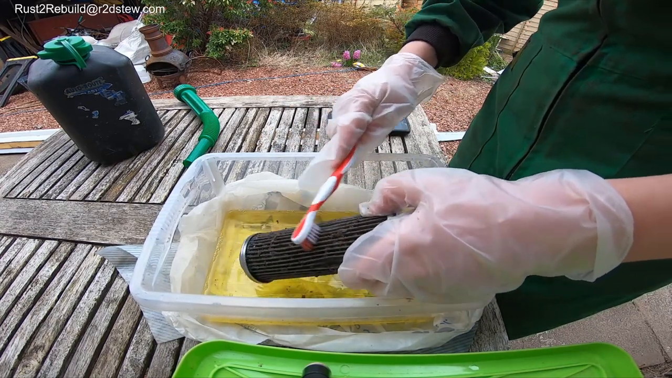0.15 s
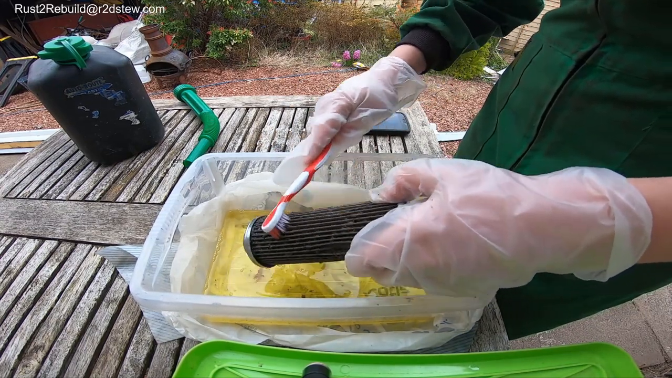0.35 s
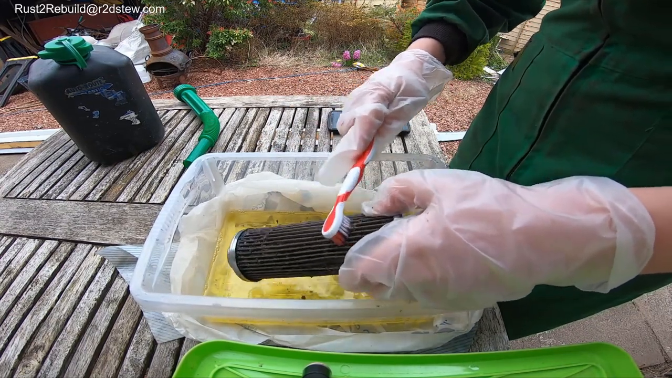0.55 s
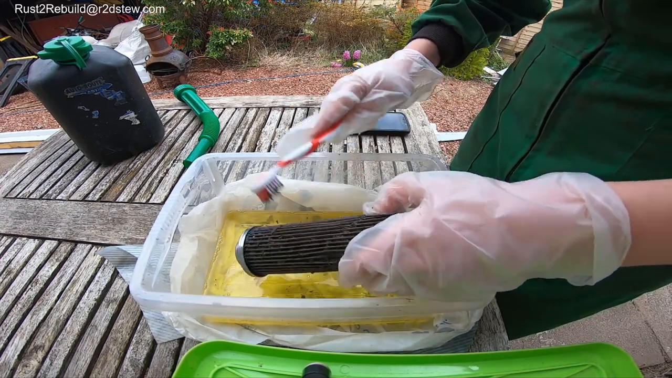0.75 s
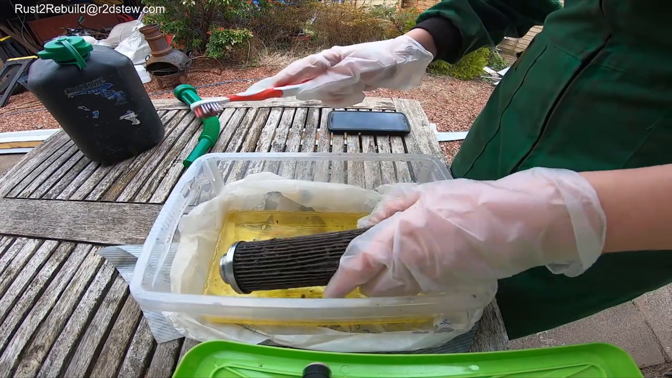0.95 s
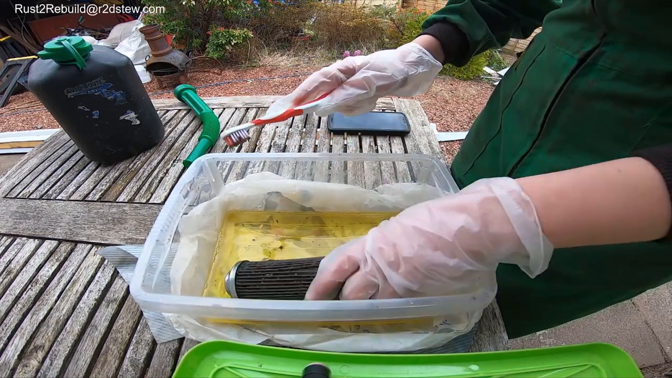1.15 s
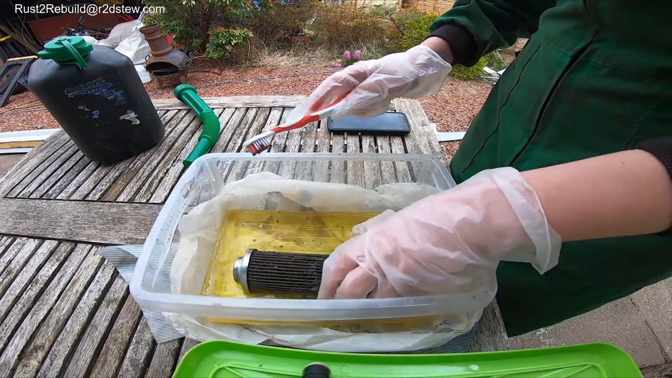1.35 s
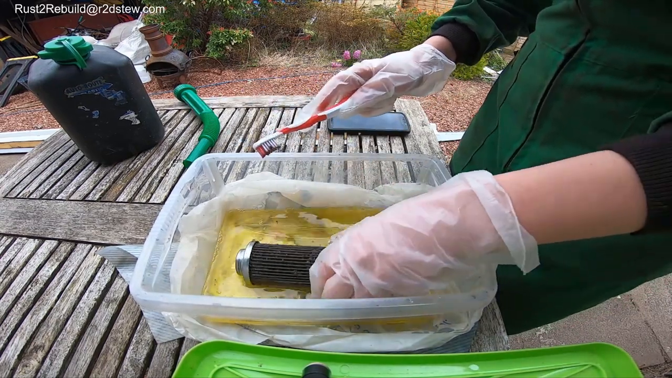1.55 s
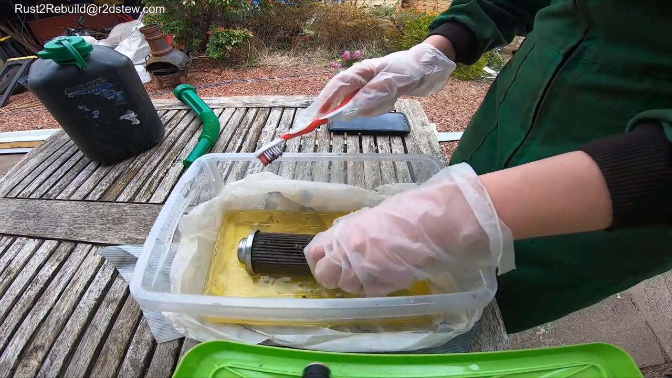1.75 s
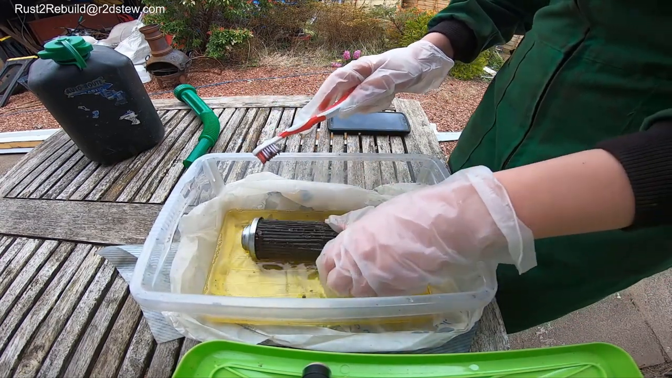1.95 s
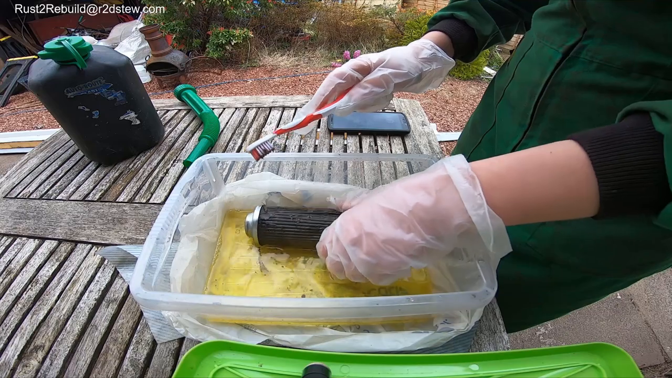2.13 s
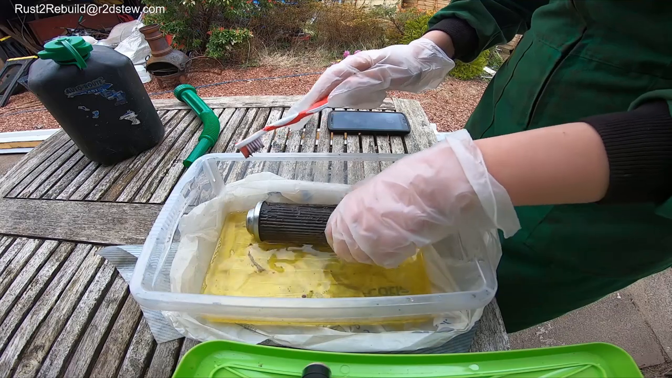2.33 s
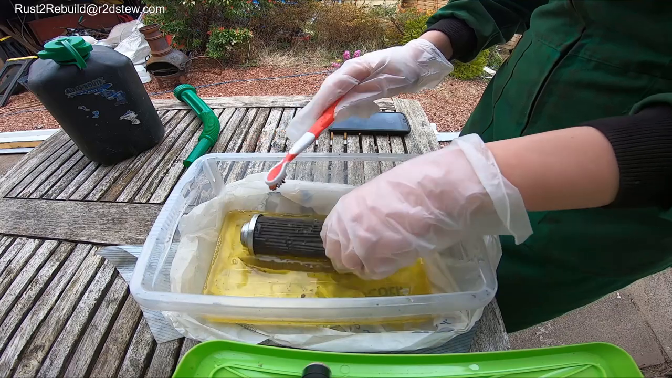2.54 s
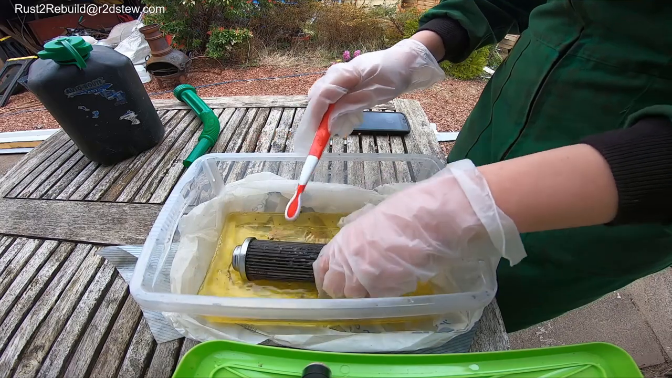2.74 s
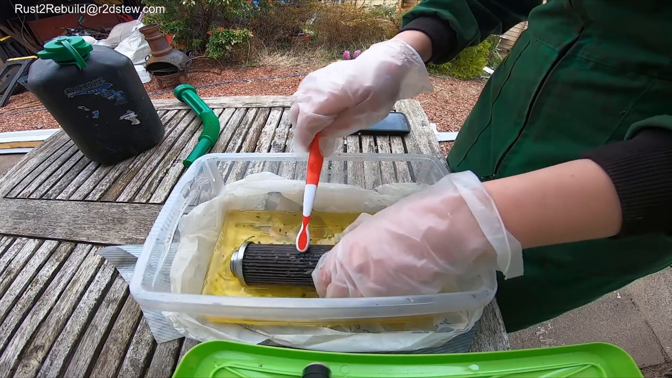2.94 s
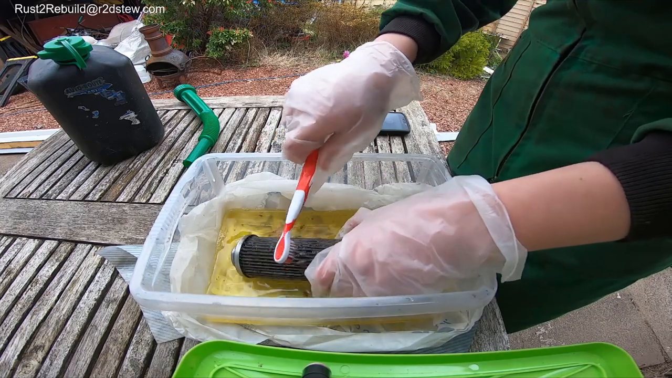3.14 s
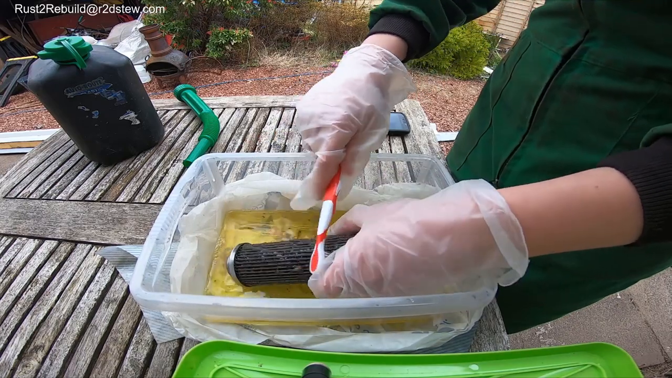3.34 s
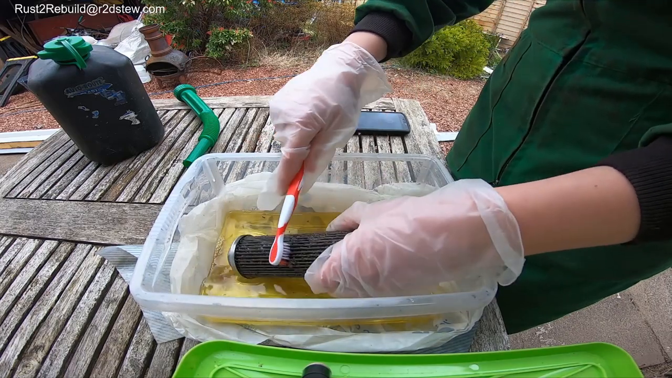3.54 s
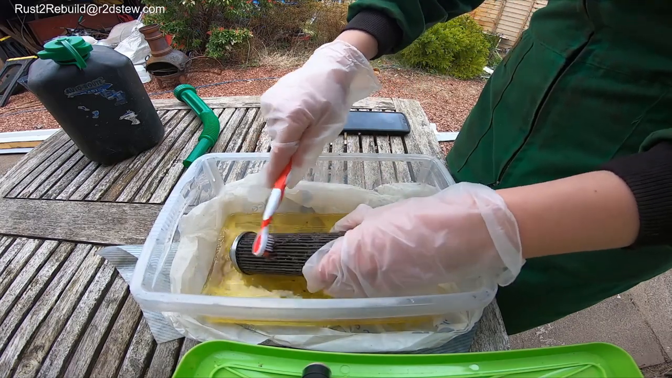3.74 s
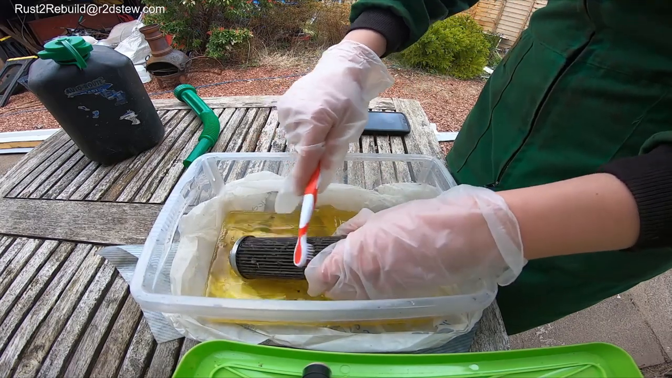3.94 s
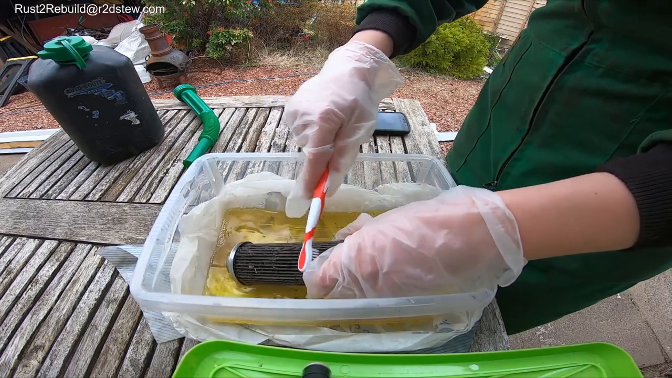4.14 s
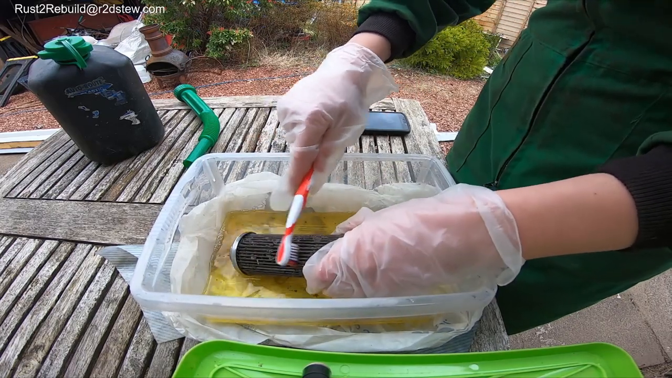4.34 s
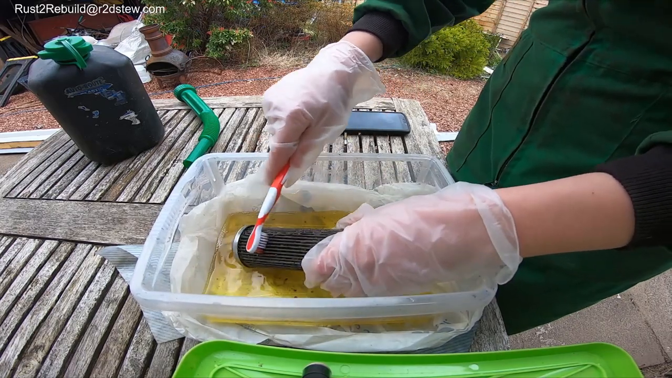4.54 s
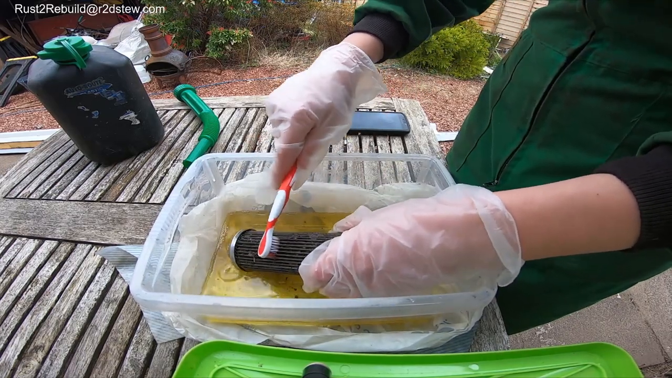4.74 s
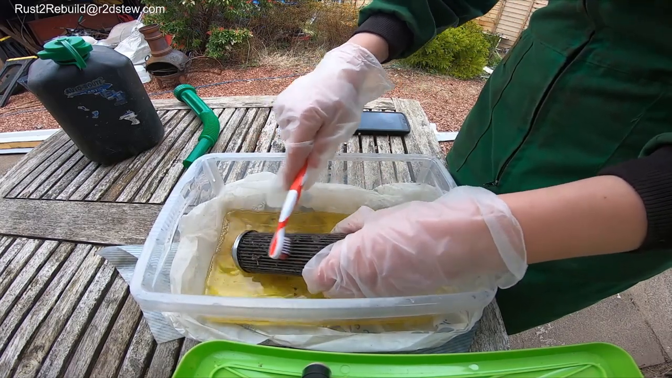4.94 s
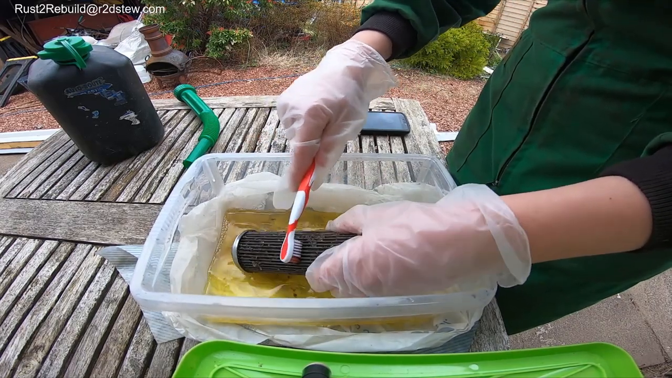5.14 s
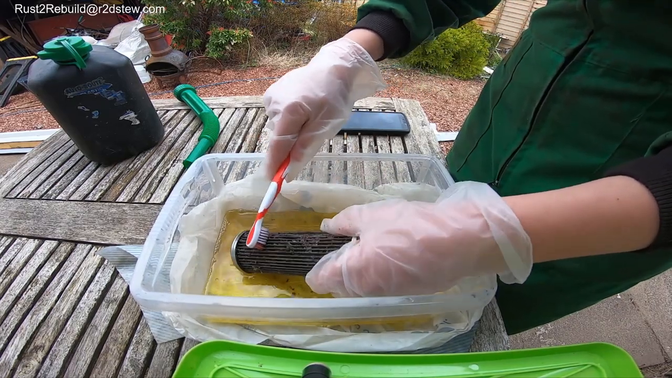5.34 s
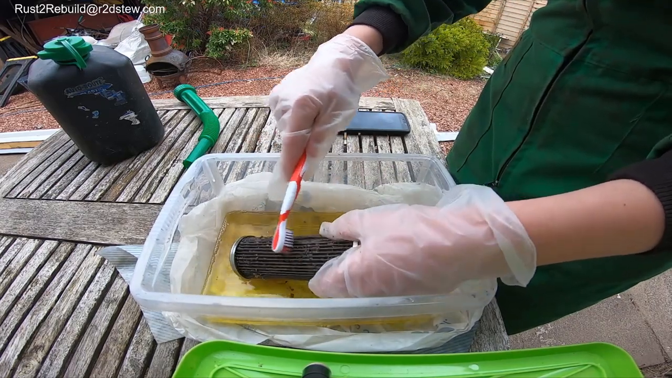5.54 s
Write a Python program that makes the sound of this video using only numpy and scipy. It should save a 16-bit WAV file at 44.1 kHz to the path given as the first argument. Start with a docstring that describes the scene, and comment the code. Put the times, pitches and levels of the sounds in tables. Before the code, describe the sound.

Close outdoor scrubbing: quick zippy bristle strokes on pleated mesh, a splashy swirl with plastic knocks, then softer, longer scrubbing with hollow knocks.

```python
"""Outdoors, close by, a toothbrush scrubs a pleated metal mesh filter in a plastic tub of liquid.
Bristle flicks and random clicks, filtered by the mesh, make the rasp of pulls and pushes, fastest in mid-stroke.
Between two bouts the filter is dipped and swirled. Its knocks on the tub, some during the second bout, are
decaying tones. The liquid gurgles with ringing bubbles. Filtered clicks and noise make sleeve, glove and wind."""
import sys
import numpy as np
from scipy import signal
from scipy.fft import rfft, irfft, next_fast_len
from scipy.io import wavfile

SR = 44100
rng = np.random.default_rng(int(sys.argv[2]) if len(sys.argv) > 2 else 0)


def transcribe(signal):
    """Save signal, clipped to [-1, 1], as a 16-bit WAV file at the path in sys.argv[1]."""
    frames = np.atleast_2d(signal).T
    limited = np.clip(frames, -1, 1)
    pcm = np.round(limited * 32767).astype(np.int16)
    wavfile.write(sys.argv[1], SR, pcm)


N = 246078  # length in samples
T = np.arange(N) / SR  # time in s
EDGE_HZ = 15800  # upper edge of the sound band

# rasp of the mesh: [f/Hz, level per Hz/dB]
RASP = [(150, -55), (300, -10.5), (500, -0.5), (900, -3), (1250, -3.5), (1600, -7.5), (2100, -2.5),
        (2800, 2.5), (4300, -5.5), (6000, -10), (7800, -13.5), (9300, -10), (11000, -20.5), (13000, -20),
        (15500, -41)]
# resonances of the filter cartridge: [f/Hz, width/Hz, lift/dB]
CARTRIDGE = [(670, 140, 14.5), (972, 130, 12.5), (1436, 146, 10), (1641, 233, 14), (2624, 60, 7),
             (3085, 77, 6), (3600, 28, 8.5), (3980, 400, 8), (5080, 260, 9.5), (6240, 370, 5),
             (6730, 54, 8), (7140, 140, 10), (8840, 630, 8.5), (8880, 75, -9)]
# the filter knocks on the tub:
# [t/s, level/dB, bass/dB, treble/dB, pitch factor, place struck as a share of the wall]
KNOCKS = [(1.1994, -10, -0.5, 7.5, 1.01, 0.38), (1.2239, -22, 3.5, 0, 0.93, .34),
          (1.2395, -34, 9, 2, .97, 0.41), (1.4042, -14.5, -0.5, 11.5, 0.91, 0.1),
          (1.4132, -23, 2, -3, 1, 0.16), (2.026, -36.5, -6, 12.5, 0.91, 0.088),
          (2.8974, -22, 11, 7.5, 1, .024), (2.941, -41, 14, -0.5, 0.94, .15),
          (3.489, -35, -3, 1, 1.15, 0.14), (3.7911, -13, 7.5, 7, 0.938, 0.297),
          (3.8968, -22, 0, -0.5, 0.98, 0.14), (4.5338, -15.5, 11, 10, 0.93, .096),
          (5.0061, -14, 12, 8.5, 0.95, 0.093), (5.033, -34.5, 5, -8, 0.93, 0.33)]
# shudder of tub and table after a knock, also used for splashing liquid: [f/Hz, level per Hz/dB]
SHUDDER = [(40, -1), (110, -35), (170, 15), (450, -5), (1100, 2), (2500, -16), (6000, -18.5), (15000, -37)]
# rumble of the buffeted microphone: [f/Hz, level per Hz/dB]
BUFFET = [(10, -19), (32, 3.5), (70, -4), (115, -9.5), (250, -3.5), (1000, -55)]


def amp(db):
    """Turns decibels into a gain."""
    return 10 ** (np.asarray(db) / 20)


def evened(x):
    """Scales a sound to an rms level of 1."""
    return x / np.sqrt(np.mean(x ** 2) + 1e-20)


def curve(rows, column=1):
    """Joins one column of a table by straight lines in time."""
    rows = np.array(rows)
    return np.interp(T, rows[:, 0], rows[:, column])


def read(points, hz):
    """Reads a spectrum whose points are joined by straight lines over log frequency."""
    f, value = np.transpose(points)
    return np.interp(np.log(hz + 1), np.log(f + 1), value)


def add(mix, s, sound):
    """Adds a sound at time s, cut off where the mix ends."""
    part = mix[max(round(s * SR), 0):][:len(sound)]
    part += sound[:len(part)]


def colour(x, spectrum, peaks=(), tilt_db=0, size=4096):
    """Filters with a spectrum, resonances on it and a tilt per octave above 1 kHz, without pre-echo."""
    hz = abs(np.fft.fftfreq(size, 1 / SR))
    db = read(spectrum, hz) + tilt_db * np.log2(np.maximum(hz, 1000) / 1000)
    for f, width, lift in peaks:
        db = db + lift / (1 + (2 * (hz - f) / width) ** 2)
    # the Hilbert transform finds the phase that lets nothing sound early
    response = np.exp(np.conj(signal.hilbert(np.log(amp(db)))))
    impulse = np.fft.ifft(response).real[:size // 2]
    return signal.fftconvolve(x, impulse)[:len(x)]


def drift(size, hz):
    """Smooth random motion of rms 1, up to about hz."""
    padded = next_fast_len(size)
    f = np.fft.rfftfreq(padded, 1 / SR)
    spectrum = rfft(rng.standard_normal(padded)) * np.exp(-(f / hz) ** 2)
    return evened(irfft(spectrum, padded)[:size])


def snaps(per_s, spread_db):
    """Random clicks of uneven size at a rate that may vary from sample to sample."""
    size = len(per_s)
    height = amp(spread_db * np.minimum(rng.exponential(1, size), 4))
    height = height * rng.choice([-1, 1], size)
    happens = rng.random(size) < per_s / SR
    return evened(height * happens)


def glide(rows, width_hz):
    """A narrow band of noise that follows a pitch and a level."""
    sounding = (T > rows[0][0]) & (T < rows[-1][0])
    phase = 2 * np.pi * np.cumsum(curve(rows)) / SR
    band = drift(N, width_hz) * np.cos(phase) + drift(N, width_hz) * np.sin(phase)
    return sounding * amp(curve(rows, 2)) * band


def pair(shared, apart):
    """The two microphone ports agree in the bass and hear more different detail in the treble."""
    # width of the microphone pair: [f/Hz, side against mid/dB]
    width = [(100, -26), (430, -27), (650, -14.5), (1200, -10), (2400, -13.5), (4400, -7.5), (8000, -3.5),
             (14000, -1.5)]
    side = colour(apart, width)
    return np.array([shared + side, shared - side])


def scattered(x, fade_s=0.0032):
    """The sound after brief reflections off tub, arms and table, made from fading noise."""
    t = np.arange(SR // 30) / SR
    echoes = rng.standard_normal(len(t)) * np.exp(-t / fade_s)
    return signal.oaconvolve(x, echoes / np.linalg.norm(echoes))[:N]


def outdoors(wind_db=-5, lump_db=4.5, air_db=-68):
    """Quiet garden air, and lumpy gusts that differ at the two microphone ports."""
    # wind on the microphone: [t/s, level before wind_db is added/dB]
    wind = [(0, -66), (.33, -64), (.45, -44.5), (.85, -59), (1.08, -64.5), (2.46, -61.5), (2.55, -47.5),
            (2.8, -63), (3.28, -55), (4.1, -52.5), (4.25, -46), (4.42, -61), (5.2, -51), (5.58, -62)]
    # garden air: [f/Hz, level per Hz/dB]
    air_spectrum = [(30, 3), (110, -3), (160, 21), (400, -6), (1000, 9.5), (3000, -24.5), (9000, -58),
                    (15000, -19)]
    eddies = rng.standard_normal((2, N)) * amp(lump_db * drift(N, 5.7))
    gusts = np.array([evened(colour(port, BUFFET)) for port in eddies])
    air = [evened(colour(rng.standard_normal(N), air_spectrum)) for _ in range(2)]
    return gusts * amp(curve(wind) + wind_db) + amp(air_db) * pair(*air)


def puffs():
    """An eddy of wind pushes on the ports: one heavily damped low swing."""
    # puffs that thump the microphone: [t/s, f/Hz, level/dB, time to fall 60 dB/s]
    swings = [(0.573, 95, -41, 0.061), (0.782, 74.5, -35.5, 0.074), (3.272, 49.4, -38, 0.073),
              (4.19, 42, -30, 0.11), (4.272, 85, -37.5, 0.12)]
    out, t = np.zeros(N), np.arange(SR // 4) / SR
    for s, hz, db, t60 in swings:
        rise = 1 - np.exp(-t * hz * np.pi)
        add(out, s, np.sin(2 * np.pi * hz * t) * rise * amp(db - 60 * t / t60))
    return out


def thumps(t60=0.31):
    """A jolt reaches the two microphone ports as a faint low rumble of fading noise."""
    # the heaviest knocks jolt the table and the microphone on it: [t/s, level/dB]
    jolts = [(1.201, -38), (1.404, -40), (3.7918, -39), (4.533, -46), (5.007, -45)]
    out, t = np.zeros((2, N)), np.arange(SR // 3) / SR
    for port in out:
        for s, db in jolts:
            rumble = evened(colour(rng.standard_normal(len(t)), BUFFET))
            add(port, s, rumble * amp(db - 60 * t / t60))
    return out


def whistle():
    """A thin high whistle, made of a narrow gliding band of noise."""
    # path of the whistle: [t/s, f/Hz, level/dB]
    path = [(3.35, 8350, -78), (3.46, 8600, -55), (3.6, 8600, -66), (3.75, 8800, -70)]
    return glide(path, width_hz=65)


def rustle():
    """Fine grains of fabric and glove sliding as the arms move, with a singing ridge of the sleeve."""
    # sleeve and glove sliding: [t/s, level/dB]
    sliding = [(0, -57), (.7, -63), (.8, -63.5), (.9, -63), (1.0, -56), (1.14, -49.5), (1.27, -52.5),
               (1.45, -54), (1.84, -54), (1.9, -58.5), (2.1, -64), (2.28, -49.5), (2.45, -57.5),
               (2.575, -41.5), (2.68, -60), (2.77, -52), (3.0, -55), (3.13, -43.5), (3.28, -46.5),
               (3.42, -59), (5.3, -59), (5.58, -66)]
    # colour of sleeve and glove: [f/Hz, level per Hz/dB]
    cloth = [(120, -28), (200, -39), (263, -5), (371, -12), (630, 1), (1050, -22), (1150, -2.5), (1260, -4),
             (1510, -1), (3070, 2), (4330, -4.5), (8820, -14.5), (15500, -41.5)]
    # singing ridge of the sliding sleeve: [t/s, f/Hz, level/dB]
    swish = [(2.2, 3400, -63), (2.29, 3080, -50.5), (2.35, 2820, -54.5), (2.42, 2750, -51),
             (2.48, 2670, -66)]
    grains = evened(colour(snaps(np.full(N, 9000.), spread_db=2), cloth))
    flicker_db = 1.75 * drift(N, 54)
    return grains * amp(curve(sliding) + flicker_db) + glide(swish, width_hz=320)


def slips():
    """The glove slips: a brief hiss swells and dies as the grip gives way."""
    # slips on the wet mesh: [t/s, length/s, level/dB, tilt per octave/dB]
    slides = [(0.923, 0.046, -54, -0.5), (1.173, 0.037, -40, -1), (1.368, .02, -43, 4),
              (2.866, 0.015, -58, -13.5)]
    out = np.zeros(N)
    for s, length, db, tilt_db in slides:
        t = np.arange(0, length, 1 / SR)
        hiss = evened(colour(rng.standard_normal(len(t)), RASP, tilt_db=tilt_db))
        add(out, s, amp(db) * hiss * np.sin(np.pi * t / length) ** 2)
    return out


def ticks(t60=0.013):
    """Films of liquid snap on mesh and glove, as short bursts of noise."""
    # small wet ticks: [t/s, level/dB]
    films = [(1.582, -47), (1.842, -47), (1.931, -46), (2.54, -43), (2.603, -47), (2.826, -47),
             (2.935, -30.5)]
    out, t = np.zeros(N), np.arange(SR // 10) / SR
    for s, db in films:
        burst = evened(colour(rng.standard_normal(len(t)), RASP, CARTRIDGE, tilt_db=2.0))
        add(out, s, burst * amp(db - 60 * t / t60))
    return out


def bubble(hz, t60, rise=4):
    """A bubble rings and rises in pitch as it nears the surface."""
    t = np.arange(SR // 8) / SR
    tone = np.sin(2 * np.pi * hz * t * (1 + rise * t))
    return tone * amp(-60 * t / t60) * (1 - np.exp(-t / 0.0088))


def liquid(count=24, crackle_db=-6):
    """Many small, quickly damped bubbles and crackling films while the liquid is stirred."""
    # stirring of the liquid: [t/s, level/dB]
    slosh = [(0, -89), (1.06, -80), (1.3, -47), (1.58, -61.5), (1.84, -62), (1.91, -49.5), (2.03, -62),
             (2.17, -58), (2.45, -69), (2.55, -46), (2.69, -51.5), (3.0, -62.5), (3.2, -49), (3.4, -59.5),
             (5.58, -67)]
    bubbles = np.zeros(N)
    for hz in np.geomspace(135, 1400, count):
        size_db = -3 * abs(np.log2(hz / 320))  # bubbles near 320 Hz are loudest
        pops = snaps(np.full(N, 24.), spread_db=-0.5) * amp(size_db)
        bubbles += signal.oaconvolve(pops, evened(bubble(hz, 9 / hz)))[:N]
    crackle = evened(colour(snaps(np.full(N, 110.), spread_db=6.0), SHUDDER, tilt_db=-2.0))
    return evened(evened(bubbles) + amp(crackle_db) * crackle) * amp(curve(slosh))


def gulps(bubble_t60=0.034, slap_t60=0.017, slap_db=-11):
    """A small wave breaks into a short, dull spatter and leaves a large bubble ringing."""
    # small waves slap the filter and trap a gulp of air: [t/s, starting bubble f/Hz, level/dB]
    waves = [(0.986, 326, -37), (1.747, 275, -32), (1.874, 404, -43), (2.54, 510, -23), (2.574, 444, -39),
             (2.603, 418, -25), (2.636, 350, -23), (2.68, 313, -19.5), (2.698, 257, -23), (2.731, 326, -27),
             (2.824, 410, -32)]
    out, t = np.zeros(N), np.arange(SR // 10) / SR
    for s, hz, db in waves:
        spatter = evened(colour(rng.standard_normal(len(t)), SHUDDER, tilt_db=-14))
        add(out, s, spatter * amp(db + slap_db - 60 * t / slap_t60))
        add(out, s, amp(db) * bubble(hz, bubble_t60))
    return out


def rattle(lag_s=0.00619, rattle_db=-25, rattle_t60=0.12):
    """After a knock the filter chatters on the wall and the shaken liquid spatters."""
    # chatter after a knock: [f/Hz, level per Hz/dB]
    chatter_spectrum = [(100, -48), (160, -6), (260, 0), (400, -2), (650, -12), (1200, -12), (2500, -20),
                        (8000, -58)]
    out, t = np.zeros(N), np.arange(SR // 5) / SR
    for s, db, *_ in KNOCKS:
        chatter = evened(colour(snaps(np.full(len(t), 700.), spread_db=-3.0), chatter_spectrum))
        add(out, s + lag_s, chatter * amp(db + rattle_db - 60 * t / rattle_t60))
    return out


def blow(bass_db, treble_db, pitch, place, ring, shudder_db=-19, shudder_t60=0.13,
         bass_lag=0.48, crack_db=-27, crack_t60=0.02):
    """The tub rings in its modes; bending waves bring the bass a little late, then the table shudders."""
    # modes of the tub with the filter on it, before the blow changes pitch, balance and ringing:
    # [f/Hz, level/dB, time to fall 60 dB/s]
    modes = [(177.5, -6, 0.087), (250, -10, 0.067), (351.6, -19, 0.12), (439, -5, 0.05), (551, -8, 0.036),
             (662.3, -1, 0.051), (947, -12, 0.047), (1214, -6, 0.029), (1542, -15, 0.03),
             (1683, -8.5, 0.024), (2195, -15, 0.031), (2617, -18.5, 0.022), (3167, -18.5, 0.019),
             (3865, -22, 0.016), (4750, -24.5, 0.0082), (6180, -26, 0.006)]
    t = np.arange(SR // 5) / SR
    touch = [(200, bass_db), (550, 0), (900, 0), (2000, treble_db)]  # [f/Hz, lift/dB]
    # hard, bright blows press on the wall and ring for less time
    ring = ring * np.exp(-0.0882 * treble_db)
    sound = np.zeros(len(t))
    for k, (hz, mode_db, t60) in enumerate(modes):
        age = np.maximum(t - bass_lag / hz, 0)
        # a mode is weak when struck near its node
        shape = (-1) ** k * (0.23 + abs(np.sin(np.pi * (k + 1) * place)))
        rise = 1 - np.exp(-age * hz * 2 * np.pi)  # soft plastic takes up the blow gradually
        level = amp(mode_db + read(touch, hz) - 60 * age / (t60 * ring))
        sound += shape * rise * level * np.sin(2 * np.pi * hz * pitch * age)
    shudder = evened(colour(rng.standard_normal(len(t)), SHUDDER))
    shudder = shudder * amp(shudder_db - 60 * t / shudder_t60) * (1 - np.exp(-t / 0.0033))
    crack = evened(colour(rng.standard_normal(len(t)), RASP, tilt_db=-1.5))
    crack = crack * amp(crack_db + treble_db - 60 * t / crack_t60)
    return sound + crack + shudder


def knocks(lowest_hz=125):
    """Heavy knocks of the filter and light taps of the brush head ring the same tub."""
    # the brush head taps the cartridge: [t/s, level/dB, treble/dB]
    taps = [(1.297, -36.5, 5), (2.148, -42.5, 8), (3.3024, -27, 9.5), (3.365, -40, -1), (4.708, -37, 6),
            (4.866, -27, 12), (5.323, -40.5, 6.5), (5.4428, -26.5, -8)]
    ring, tap_ring = 1.58, 1.62  # factors on the ringing time: every blow, and taps on top of that
    out = np.zeros(N)
    for s, db, bass_db, treble_db, pitch, place in KNOCKS:
        add(out, s, amp(db) * blow(bass_db, treble_db, pitch, place, ring))
    for s, db, treble_db in taps:
        tap = blow(bass_db=-37, treble_db=treble_db, pitch=0.97, place=.11, ring=ring * tap_ring)
        add(out, s, amp(db) * tap)
    # a small tub radiates little bass
    return signal.sosfilt(signal.butter(2, lowest_hz, "high", fs=SR, output="sos"), out)


def hollow(size):
    """Uneven drag, made of random clicks, rings the hollow cartridge."""
    # hollow ring of the cartridge under the brush: [f/Hz, level per Hz/dB]
    hollow_spectrum = [(100, -68.5), (170, -26), (300, -33.5), (440, -7.5), (540, -4.5), (620, 1.5),
                       (665, 7.5), (730, -8), (820, -35), (1000, -33), (1400, -40), (3000, -45.5)]
    return evened(colour(snaps(np.full(size, 1500.), spread_db=3), hollow_spectrum))


def bite(scrape_db, ring_db, t60=0.067):
    """The bristles catch on the mesh: a short scrape and a ring of the cartridge."""
    t = np.arange(SR // 10) / SR
    scrape = evened(colour(snaps(np.full(len(t), 4000.), spread_db=-8.5), RASP, CARTRIDGE))
    return (amp(scrape_db) * scrape + amp(ring_db) * hollow(len(t))) * amp(-60 * t / t60)


def turn(length_s):
    """A soft rasp that swells and fades as the bristles fold over."""
    t = np.arange(0, length_s, 1 / SR)
    clicks = snaps(np.full(len(t), 4000.), spread_db=1)
    return evened(colour(clicks, RASP, CARTRIDGE, tilt_db=1.0)) * np.sin(np.pi * t / length_s)


def tufts(pleat_hz, scatter, count=3):
    """Each tuft flicks once per pleat; the tufts bend, skip and grip again, so their speeds wander apart."""
    out = np.zeros(len(pleat_hz))
    orders = np.arange(1, 9)[:, None]  # the flick's overtones
    for _ in range(count):
        hz = pleat_hz * (1 + scatter * drift(len(out), 124.0))
        turns = np.cumsum(hz) / SR + rng.random()
        overtones = np.cos(2 * np.pi * orders * turns) / orders ** 0.55
        flicks = (overtones * (orders * hz < EDGE_HZ)).sum(0)
        grip = 1 / (1 + np.exp(1.5 - 3 * drift(len(out), 150)))
        out += flicks * grip
    return evened(out)


def brush(clump_db=1.27, ring_clump_db=3, drag=0.052):
    """Speed rises and falls in each stroke and sets loudness and pleat rate; pulls chirp, pushes are gritty."""
    # brush strokes, pulled and pushed in turn:
    # [bristles bite t/s, end t/s, level/dB, top pleat rate f/Hz, hollow ring level/dB]
    strokes = [(.027, .11, -35, 2670, -44), (.164, .285, -33, 2170, -44.5), (.324, .41, -35.5, 2810, -45.5),
               (.461, .58, -33.5, 2420, -46), (.612, .7, -33.5, 3123, -49.5), (.735, .772, -51, 1230, -47),
               (3.345, 3.425, -41.5, 1704, -49), (3.44, 3.53, -44, 1405, -51), (3.52, 3.58, -49, 1280, -55),
               (3.625, 3.71, -42, 1880, -46), (3.725, 3.835, -40, 2474, -49),
               (3.863, 3.962, -35, 1470, -38.5), (3.982, 4.09, -38, 2280, -59),
               (4.133, 4.215, -38, 2333, -49), (4.232, 4.342, -39, 1910, -53),
               (4.373, 4.458, -35, 2760, -49), (4.482, 4.58, -36.5, 2813, -49),
               (4.606, 4.71, -35.5, 2683, -45), (4.715, 4.825, -37, 2693, -50.5),
               (4.853, 4.93, -34, 2525, -58), (4.946, 5.055, -37, 2792, -51.5),
               (5.085, 5.172, -40.5, 1504, -41.5), (5.185, 5.275, -50, 895, -58.5),
               (5.413, 5.54, -41, 896, -42.5), (5.556, 5.66, -44, 908, -47.5)]
    # how the resonances change while the filter is held above the liquid: [f/Hz, width/Hz, lift/dB]
    held_high = [(953, 280, -15), (1214, 230, 9), (1720, 680, 2), (2760, 300, -5), (4050, 180, -2),
                 (6690, 68, 7), (8900, 770, -1)]
    # the two directions: (share of bristles in step before the rate lowers it, power of speed in the level,
    # fastest moment as a share of the stroke, bite against the stroke in dB)
    pull, push = (0.96, 1.62, 0.4854, -6.5), (0.15, 1.13, .46, 0)
    dipped_s = 1.0  # the filter is held clear of the liquid until then
    lead_s = .02  # the brush starts to move this long before it bites
    skim_db, grip_s = -2, 0.0028  # the rasp is weaker until the bristles bite, then grips this fast
    in_step_rate_hz = 3380  # bristles lock to the pleats better as the stroke nears this rate
    bright_db_per_octave, plain_rate_hz = 1.5, 1360  # faster strokes tilt the rasp upwards
    held_tilt_db = 2.5  # extra tilt per octave while the filter is clear of the liquid
    bite_ring_db = 9.5  # ring of the bite against the hollow ring
    turn_db, turn_s = -14, .05  # bristles folding over: level against the stroke, length
    out = np.zeros(N)
    for k, (s, end, db, top_hz, ring_db) in enumerate(strokes):
        pushed, held = k % 2, s < dipped_s
        in_step, power, fastest, bite_db = push if pushed else pull
        start = s - lead_s
        t = np.arange(0, end - start, 1 / SR)
        progress = np.interp(t / (end - start), [0, fastest, 1], [0, .5, 1])
        speed = np.abs(np.sin(np.pi * progress))
        # slow bristles fall out of step
        share = np.clip(in_step * (top_hz / in_step_rate_hz) ** 2, 0, 1) * speed ** 2
        grit = snaps(1500 + 5000 * speed, spread_db=0.5)
        chirp = tufts(top_hz * (.25 + .75 * speed ** 3), scatter=.09)
        drive = np.sqrt(share) * chirp + np.sqrt(1 - share) * grit
        drive = drive * amp(clump_db * drift(len(t), 160))
        peaks = list(CARTRIDGE) + (list(held_high) if held else [])
        tilt_db = bright_db_per_octave * np.log2(top_hz / plain_rate_hz) + held_tilt_db * held
        rasp = evened(colour(drive, RASP, peaks, tilt_db))
        grip = amp(skim_db * np.clip((lead_s - t) / grip_s, 0, 1))
        add(out, start, amp(db) * grip * rasp * (speed ** power + drag))
        ringing = hollow(len(t)) * speed ** 0.5 * amp(ring_clump_db * drift(len(t), 73))
        add(out, start, amp(ring_db) * grip * evened(ringing))
        if pushed:  # after a push the bristles stay on the mesh and fold over
            add(out, end - turn_s / 4, amp(db + turn_db) * turn(turn_s))
        add(out, s, bite(db + bite_db, ring_db + bite_ring_db))
    return out


def scene():
    """Bristles and fabric are spread-out sources; tub and liquid widen only by their reflections."""
    # two independent draws of the spread-out sources: one for the middle, one for the sides
    shared, apart = (brush() + rustle() + slips() + whistle() for _ in range(2))
    tub = knocks() + rattle() + liquid() + gulps() + ticks()
    return pair(shared + tub, apart + scattered(tub)) + outdoors() + puffs() + thumps()


def record(dry):
    """A low-pass filter removes what lies above the edge of the sound band."""
    low_pass = signal.firwin(511, EDGE_HZ, window=("kaiser", 9), fs=SR)
    return signal.oaconvolve(dry, low_pass[None], "same")


dry = scene()
out = record(dry)
transcribe(out)
```